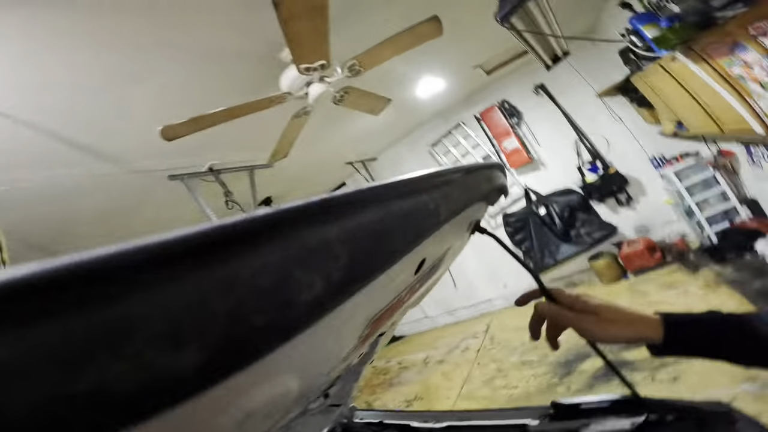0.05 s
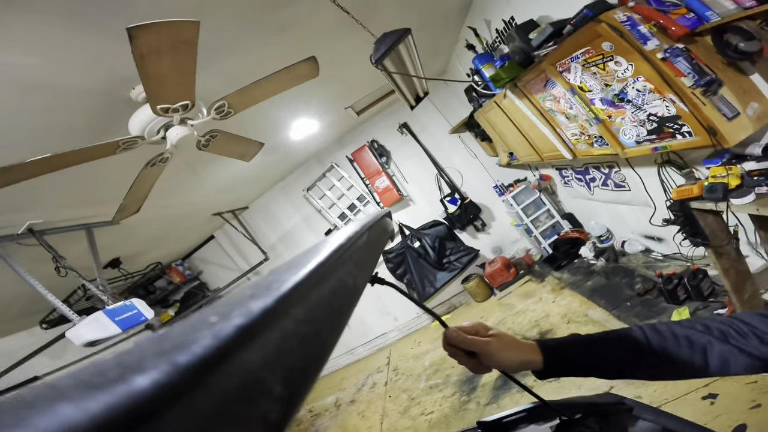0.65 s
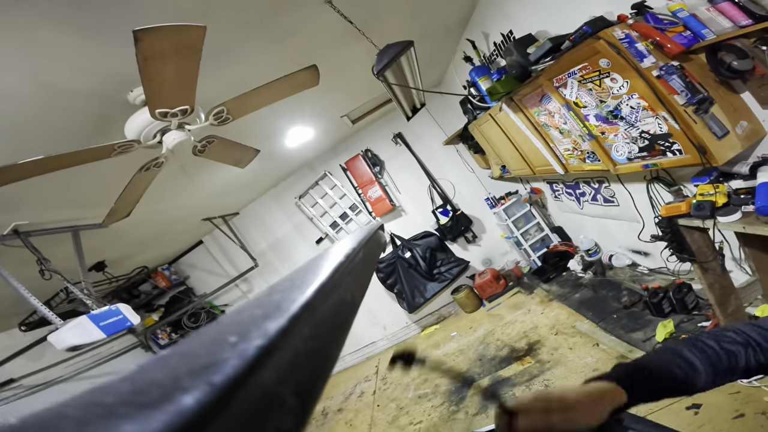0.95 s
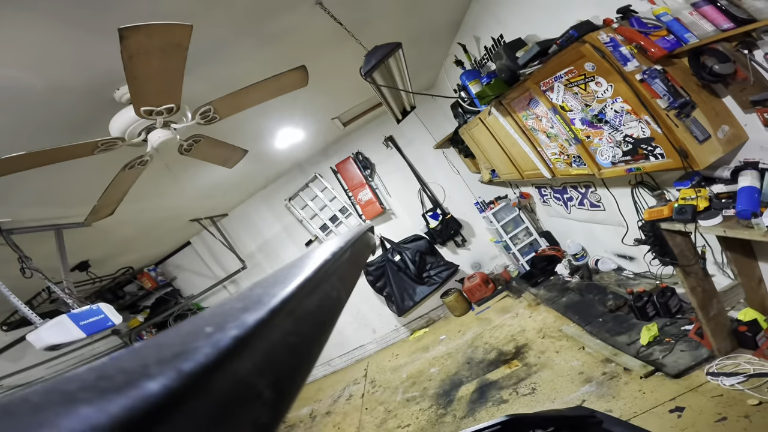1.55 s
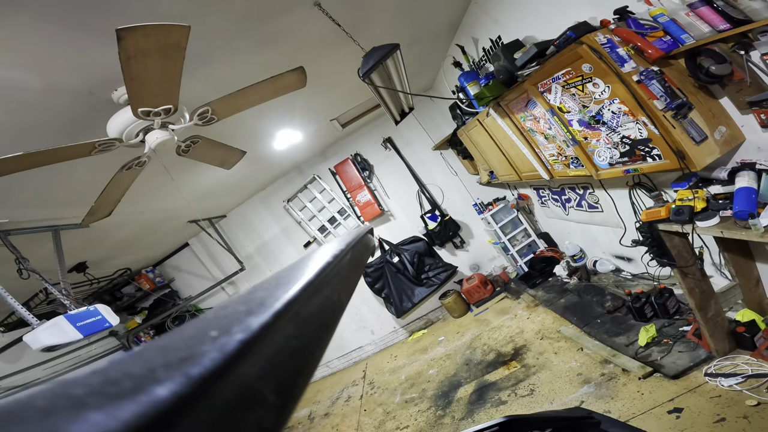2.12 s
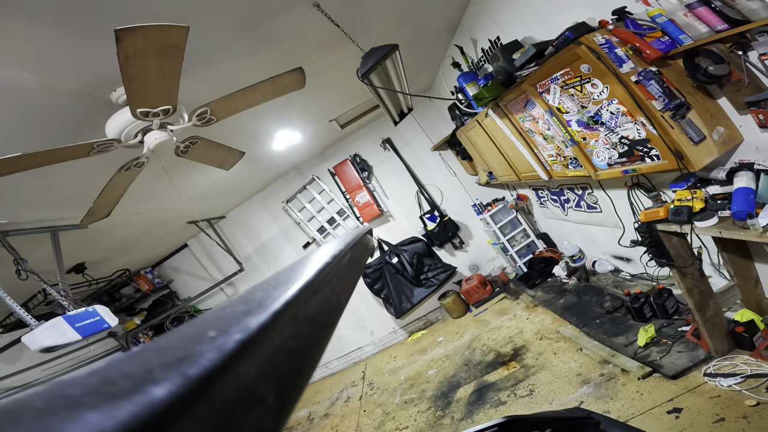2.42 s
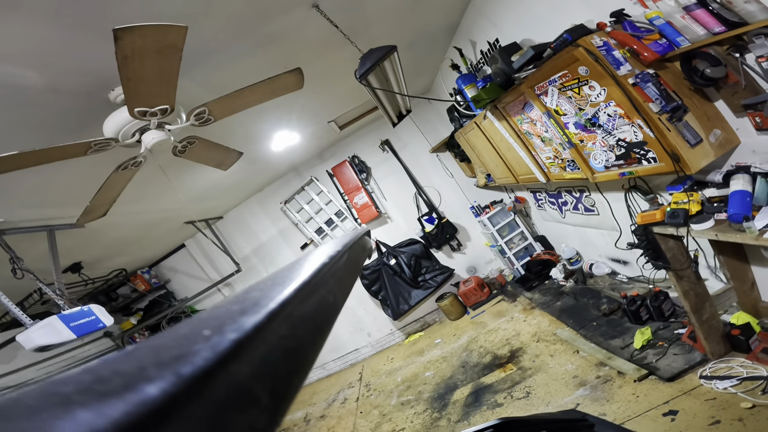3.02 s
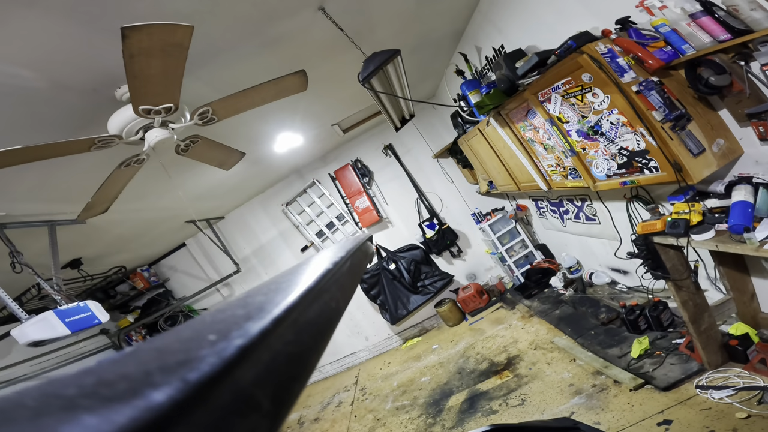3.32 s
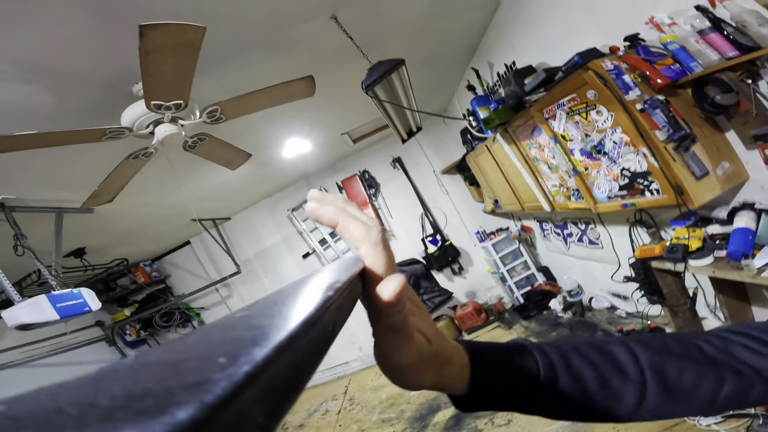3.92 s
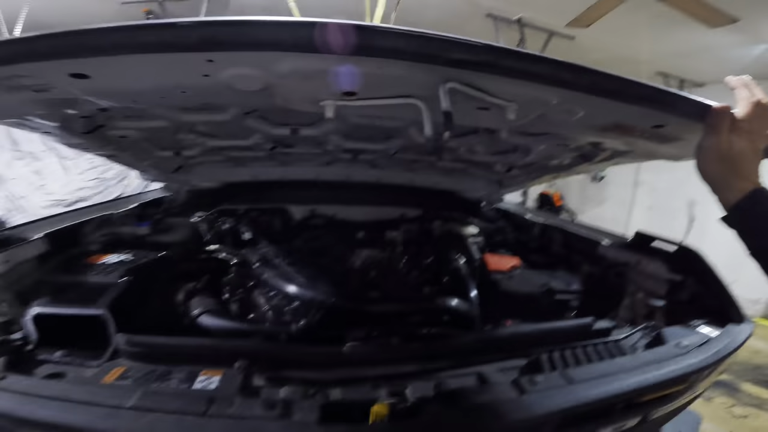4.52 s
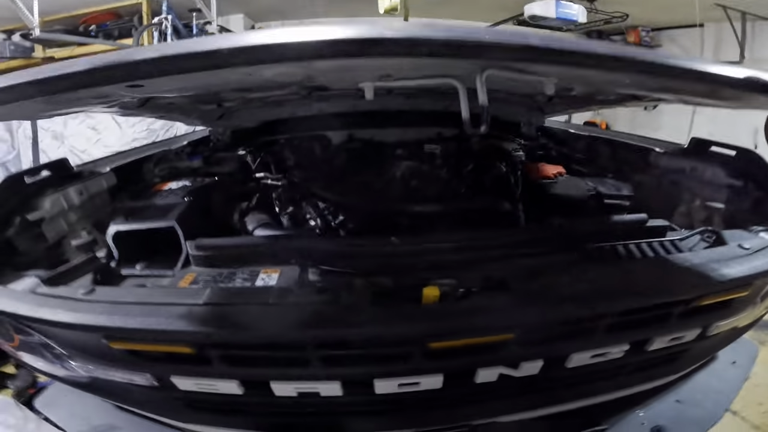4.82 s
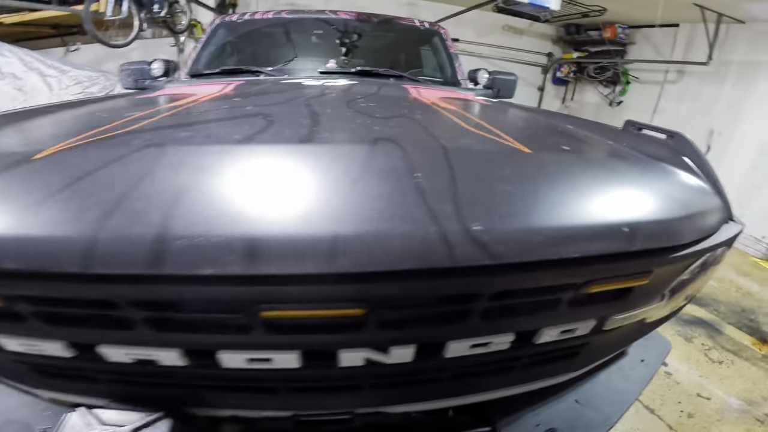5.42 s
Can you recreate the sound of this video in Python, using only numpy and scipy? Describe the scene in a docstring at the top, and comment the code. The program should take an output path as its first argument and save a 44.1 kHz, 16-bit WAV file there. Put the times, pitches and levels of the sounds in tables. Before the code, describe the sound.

Clothing rustles and bumps a body-worn microphone while a car hood's prop rod is unhooked with a cluster of metallic clunks. The rod taps lightly as it swings down and clacks into its holder. After a quieter stretch of rubbing and low rumble, the hood slams shut, its sheet steel and latch ringing briefly in the garage.

```python
"""A car hood slams in a garage: the sheet steel booms, the latch catches and the room rings.
Before that, the prop rod is unhooked, swung down and snapped into its clip, and a hand pulls the hood down.
Each knock is a burst of tiny impacts that sets the steel ringing and echoes in the room.
The microphone is worn on the body, so movement adds a low rumble and the rustle of a sleeve."""
import sys
import numpy as np
from scipy import signal
from scipy.fft import rfft, irfft, next_fast_len
from scipy.io import wavfile
from scipy.ndimage import uniform_filter1d

SR = 44100
rng = np.random.default_rng(int(sys.argv[2]) if len(sys.argv) > 2 else 0)


def output_pcm(signal):
    """Save a mono or channel-first signal as 16-bit PCM at the path in sys.argv[1].

    Samples are clipped to [-1, 1] before scaling.
    """
    pcm = np.clip(np.atleast_2d(signal).T, -1, 1) * 32767
    wavfile.write(sys.argv[1], SR, np.round(pcm).astype(np.int16))


N = 249517

# A "colour" says how strong low and high pitches are. Levels are relative: the functions add overall gains.
# Colours of the background noises (frequency [Hz], level [dB])
AIR_COLOUR = [(30, -1), (100, -9.5), (200, -4.5), (450, -32), (1200, -40.5), (3500, -46.5), (5500, -43),
              (9000, -49.5), (13000, -53.5)]  # still air
RUMBLE_COLOUR = [(12, 3), (33, 9.5), (55, -4), (100, -17.5), (180, -22), (300, -44.5), (600, -51),
                 (2000, -85.5)]  # the shaken microphone
BUFFET_COLOUR = [(30, -16), (80, 10.5), (170, 2.5), (280, -12), (500, -28), (1200, -89)]  # air and cloth pushing on the microphone
SLEEVE_COLOUR = [(100, -12.5), (250, -3), (400, 2), (700, -11), (1000, -11), (1600, -11.5), (2500, -22),
                 (4000, -26), (6500, -26), (8500, -40.5), (13000, -45.5), (15000, -53)]  # a rustling sleeve
SLIDE_COLOUR = [(400, -22), (800, -15.5), (1130, -4.5), (1450, -14), (2500, -23.5), (7000, -36.5),
                (9500, -58)]  # a hand sliding on steel
SCRAPE_COLOUR = [(300, -25), (950, -8.5), (1600, -9.5), (2600, 6.5), (5800, 6), (7500, 5), (13500, -4),
                 (15000, -26.5)]  # cloth dragging close by
DRAG_COLOUR = [(550, -20), (800, -15), (950, 11), (1150, -4), (1750, -16), (2200, -7), (5000, -18),
               (5700, -10), (6900, -36), (14000, -33)]  # steel rubbing on steel

# Stereo width. "Mid" is what left and right share, "side" is how they differ.
# (frequency [Hz], side against mid [dB])
NEAR_WIDTH = [(30, -12.5), (200, -15.5), (1000, -5.5), (4000, -7), (12000, -3)]
ROD_WIDTH = [(30, -24.5), (150, -31), (500, -43.5), (1200, -24.5), (3000, -17.5), (6500, -14.5),
             (12000, -6)]
HOOD_WIDTH = [(30, -19.5), (150, -38), (500, -14.5), (1200, -12), (3000, -7), (6500, -12.5), (12000, -1.5)]

# Shifts of the body (peak time [s], swell time [s], rumble level [dB], rustle level [dB])
BODY_MOVES = [ (0.01, 0.024, -8, -54), (0.154, 0.085, -21, -50.5), (0.345, 0.036, -17.5, -36),
              (0.527, 0.079, -33, -49.5), (3.41, 0.054, -33, -66), (3.62, 0.024, -37, -82.5),
              (3.938, 0.077, -33.5, -50.5), (4.259, 0.18, -25, -57), (4.55, 0.21, -40, -57.5),
              (4.96, 0.089, -62.5, -55.5), (5.42, 0.71, -34, -57.5)]
# Air and cloth hit the microphone as the hood comes down (peak time [s], swell time [s], level [dB])
BUFFETS = [(4.16, 0.13, -39), (4.26, 0.036, -31), (4.35, 0.026, -28), (4.92, 0.078, -43)]
# The hand slides on the rod, then on the hood (peak time [s], swell time [s], level [dB])
HAND_SLIDES = [(1.58, 0.053, -70), (1.89, 0.32, -61), (2.3, 0.18, -59.5), (2.57, 0.13, -62),
               (3.25, 0.076, -63.5), (3.94, 0.05, -56.5), (5.0, 0.19, -56)]
# Cloth drags near the microphone (start [s], length [s], level [dB])
CLOTH_SCRAPES = [(0.114, 0.058, -62), (2.25, 0.11, -80), (0.34, 0.019, -54), (3.925, 0.14, -74.5),
                 (4.927, 0.074, -71)]
# A fingertip on paint, then the hinge (peak time [s], swell time [s], level [dB], pitch [Hz])
SQUEAKS = [(3.86, 0.025, -55.5, 890), (4.319, 0.011, -49.5, 458)]
# The rod's tip drags out of its slot (start [s], length [s], level [dB])
ROD_DRAG = (0.322, 0.091, -38.5)

# How long the garage echoes; a "ring time" is the time to fade by 60 dB (frequency [Hz], ring time [s])
ECHO_TIMES = [(60, 0.84), (160, 0.58), (420, 0.53), (1100, 0.59), (2900, 0.6), (5500, 0.58), (8000, 0.36),
              (14000, 0.11)]
# Colour of that echo (frequency [Hz], level [dB])
ECHO_COLOUR = [(40, 5.5), (150, 4), (500, 6), (1200, 1.5), (3000, 2.5), (6500, -0.5), (9000, 4.5),
               (15000, -0.5)]
# Colour shared by all blows (frequency [Hz], level [dB])
STEEL_COLOUR = [(8, -10), (25, 10), (60, 11.5), (180, 14.5), (400, 6.5), (650, 1), (800, 2), (1100, 1.5),
                (1600, -3), (2300, -5), (3500, -6.5), (6500, -5), (8500, -10.5), (13500, -9), (15500, -25)]
# The pitches each struck part favours, listed by its name (frequency [Hz], peak height [dB])
PART_PEAKS = { "mount": [(380, 1.5), (920, 8.5), (1250, 12), (1700, 6), (5600, -9)], "hook": [(670, 10),
              (931, 1.5), (1085, 11.5), (1400, 15), (1560, 11), (1760, 14)], "rod": [(430, 15), (690, 13),
              (900, 10.5), (1150, 11.5), (1400, 11), (1770, 9), (2300, 14), (2650, 14), (4100, 4),
              (6300, 1.5)], "panel": [(305, 7), (560, 9), (690, 10.5), (1060, 11.5), (2150, 10.5),
              (2520, 10.5), (3050, 14), (6000, 14.5)], "trim": [(340, 8.5), (550, 8.5), (710, 8), (1115, 6),
              (1450, 7.5), (2080, 6), (2860, 6)], "socket": [(240, 4), (550, 4), (1030, 10.5), (1270, 8.5),
              (1600, 8), (5500, 8), (7200, 14)], "cover": [(300, 2), (780, 2), (1000, 2), (2000, 3)],
              "frame": [(370, 2), (550, 11), (920, 2.5), (1110, 6.5), (1400, 9)], "clip": [(420, 5.5),
              (560, 5), (1100, 5), (1320, 5.5), (1840, 1), (2220, 2.5), (2820, 5.5), (5550, 3),
              (7200, 4.5)], "seat": [(680, 11), (990, 12), (1400, 9), (1650, 5.5), (1990, 5.5),
              (7000, 3.5)], "hinge": [(375, 10), (690, 3.5), (1010, 8), (1270, 7.5), (1460, 7.5),
              (2550, 12)], "striker": [(320, 10), (1250, 17.5), (1500, 14.5), (1870, 14), (2300, 14),
              (4120, -3.5), (6200, 2.5), (10500, 8)], "latch": [(340, 3), (510, 6.5), (1100, 3.5),
              (1350, 8), (2100, -1.5), (10200, 5)], "spring": [(420, 12.5), (1400, 9.5), (3500, -2),
              (6850, 11)], "catch": [(300, 10.5), (530, 7), (950, 1), (2300, 0), (3900, 5), (5720, 4)]}
# A soft, low thud on the microphone's mount (frequency [Hz], peak height [dB])
PART_PEAKS["low bump"] = [(375, 10), (690, 3.5), (1010, 8), (1270, 7.5), (1460, 7.5), (2550, 12)]
# "Modes" are the tones a part rings with by itself (frequency [Hz], level [dB], ring time [s])
HARDWARE_MODES = [(1825, 3.5, 0.49), (1930, -2.5, 0.22), (2117, 3.5, 0.36), (2260, -0.5, 0.4),
                  (2880, -6.5, 0.48), (7000, 10, 0.1)]  # rod, clip and latch
HOOD_MODES = [(108.8, -10.5, 0.53), (171.8, -0.5, 0.37), (221.1, -6, 0.36), (317, -2.5, 0.29),
              (395.4, 0.5, 0.2), (518.4, 0, 0.21), (562, -3, 0.3), (612, -4, 0.46), (664.6, -1, 0.38),
              (950, -4.5, 0.35), (1066, -11, 0.46), (1118, -1.5, 0.093)]  # the hood's sheet steel

# Four lists of blows, one blow a row (time [s], level [dB], extra bass [dB], tilt [dB per octave],
# dull above [Hz], struck part [name], clatter time [s], room echo [dB], hood ring [dB])
MOUNT_BUMPS = [  # the microphone's mount on clothing
    (0.318, -19, -1.5, -1, 1400, "mount", 0.0014, -14, -27),
    (0.3245, -26, -6.5, 0.5, 4600, "mount", 0.0013, -11.5, -17.5),
    (0.398, -26.5, -0.5, 1, 1400, "mount", 0.0018, -15.5, -18.5),
    (0.434, -36, 9.5, -12, 2346, "low bump", 0.005, -32, -14.5)]
DULL_KNOCKS = [ (0.363, -27, 3.5, 8, 1880, "hook", 0.0016, -18, -15.5),
               (0.472, -12, -11, 4.5, 1400, "hook", 0.0066, -21.5, -2),
               (1.166, -29, 8, 5.5, 2070, "trim", 0.003286, 3, 2),
               (1.644, -30.5, 0, 7, 2200, "cover", 0.022, -14, 4),
               (1.667, -30.5, -13, 3.5, 2760, "cover", 0.012, -2, 8),
               (2.368, -41.5, 5, 2.5, 1670, "frame", 0.0025, -8, -5),
               (2.42, -34, -3, 1, 1540, "frame", 0.0053, -9, -7),
               (2.556, -38, 4, 0.5, 1886, "frame", 0.00365, -10.5, -3),
               (3.261, -40.5, -6, -2, 1980, "cover", 0.0011, -9.5, 0.5)]  # softer contacts, as on plastic trim
ROD_KNOCKS = [ (0.62, -25, 8.5, -0.5, 1880, "frame", 0.0058, 1, 3.5),
              (0.662, -8, 3.5, 4, 1870, "rod", 0.0045, -8.5, -7.5),
              (0.693, -15.5, -0.5, -1.5, 1300, "rod", 0.0029, -5, 7.5),
              (0.716, -8.5, -9.5, -1.5, 1980, "panel", 0.0015, -12, 3),
              (1.107, -45.5, 2, 4, 1380, "frame", 0.001, 2.5, -11),
              (2.07, -24.5, -11.5, 0, 1670, "socket", 0.0045, -10, -12),
              (2.083, -29, 3.5, 1, 1600, "socket", 0.0063, -5.5, -1),
              (2.807, -11, -5.5, 6.5, 1750, "clip", 0.0017, -2.5, -15),
              (2.811, -12.5, -5.5, 4, 1800, "clip", 0.0021, -1.5, -13),
              (2.86, -27.5, 7, 6.5, 2700, "seat", 0.12, 6.5, -2.5),
              (2.873, -26.5, 14.5, -0.5, 2400, "clip", 0.0022, -7, 5),
              (2.931, -11, -3.5, 4.5, 1540, "seat", 0.0032, -7.5, -7.5)]  # the bare rod on hood, frame and clip
HOOD_BLOWS = [ (3.52, -53.5, 4.5, -4.5, 2490, "hinge", 0.0021, -13, -7),
              (3.783, -48.5, 16.5, -2.5, 3000, "panel", 0.0021, -0.5, -1.5),
              (3.959, -43.5, 4.5, -2.5, 4000, "catch", 0.0029, -7, -2.5),
              (4.481, -41, -22, -2.5, 3160, "hinge", 0.0028, -1.5, 0.5),
              (4.589, -27.5, -1.5, -1, 1150, "hinge", 0.0078, -7.5, 0.5),
              (4.781, -46, 0.5, -7, 2300, "hinge", 0.0057, -6, -8),
              (5.1, -8.5, -3, 3, 4220, "striker", 0.002, -10, -5),
              (5.1101, -14.5, 18, 4, 4400, "latch", 0.0025, -18, -3),
              (5.119, -8.5, 9, 2.5, 2426, "latch", 0.003, -5, -1.5),
              (5.125, -17.5, 7, -5, 2980, "latch", 0.0084, -3.5, -5),
              (5.137, -23.5, 12.5, 0.5, 2390, "latch", 0.0032, -8.5, -16),
              (5.157, -18, 7, 0, 1410, "hinge", 0.00083, -2, -7),
              (5.185, -19.5, 18.5, 2, 3460, "spring", 0.0045, -4, 5),
              (5.199, -16, 3.5, 3, 3700, "catch", 0.0021, -15, -4),
              (5.2574, -15.5, -8, -1, 2640, "catch", 0.002, -9, 2.5),
              (5.645, -33, -13, 0, 2500, "frame", 0.004, -7, 3)]  # hand, hinges, slam and latch
# Wide panels flexing (time [s], starting pitch [Hz], level [dB], ring time [s], pitch lost [share])
PANEL_BOOMS = [ (0.116, 40.8, -16.5, 0.63, 0.17), (0.438, 45, -6.5, 0.064, 0), (0.716, 310, -12, 0.039, 0),
               (0.618, 48.5, -8, 0.062, 0), (0.688, 97.5, -13.5, 0.16, 0.42),
               (0.714, 165.5, -15.5, 0.31, 0.027), (2.108, 100.6, -30, 0.47, 0.034),
               (2.683, 180.3, -32, 0.12, 0.057), (2.811, 182.5, -5, 0.11, 0.16),
               (2.814, 62.7, -22.5, 0.42, 0.24), (2.832, 93.4, -12.5, 0.15, 0.049),
               (2.86, 185.6, -22, 0.22, 0.04), (5.114, 50, -4, .18, 0), (5.119, 314, -29, 0.8, 0.057),
               (5.127, 239, -20, 0.64, 0.067), (5.191, 120, -20, 0.12, 0.13),
               (5.198, 189.7, -4.5, 0.16, 0.011), (5.271, 143, -26, 0.77, 0.38),
               (5.385, 40.5, -12.5, 0.12, 0.25)]


def amp(db):
    """Turns decibels into a number to multiply by."""
    return 10 ** (np.asarray(db) / 20)


def unit(x):
    """Scales a signal to an average power of one."""
    return x / np.sqrt(np.mean(x ** 2) + 1e-20)


def curve_at(points, hz):
    """Reads a table between its rows, along straight lines on a pitch scale."""
    table_hz, value = np.transpose(points)
    return np.interp(np.log(hz + 1), np.log(table_hz + 1), value)


def add(mix, time, sound):
    """Mixes a sound in at a time in seconds."""
    part = mix[..., max(round(time * SR), 0):][..., :sound.shape[-1]]
    part += sound[..., :part.shape[-1]]


def coloured(x, colour):
    """Turns each pitch up or down as a colour table says."""
    size = next_fast_len(x.shape[-1] + 2048)
    gain = amp(curve_at(colour, np.fft.rfftfreq(size, 1 / SR)))
    return irfft(rfft(x, size) * gain, size)[..., :x.shape[-1]]


def shortest_click(colour_db):
    """The quickest-dying click that has this colour (a minimum-phase response)."""
    log_gain = np.log(amp(np.r_[colour_db, colour_db[-2:0:-1]]))
    return np.fft.ifft(np.exp(np.conj(signal.hilbert(log_gain)))).real


def stereo(mid, side, width):
    """Left and right at two close microphone openings: alike in the bass, less so in the treble."""
    side = coloured(side, width)
    return np.array([mid + side, mid - side])


def noise(colour, width=NEAR_WIDTH):
    """Steady stereo noise of a given colour."""
    mid, side = coloured(rng.standard_normal((2, N)), colour)
    return unit(stereo(mid, side, width))


def wobble(shape, span):
    """A random wander around zero, smoothed over `span` points."""
    return unit(uniform_filter1d(rng.standard_normal(shape), span))


def swells(rows):
    """Loudness of gestures that grow to a peak and fade at the same pace; their powers add."""
    t = np.arange(N) / SR
    return np.sqrt(sum((amp(db) * np.exp(-abs(t - peak) / swell)) ** 2 for peak, swell, db in rows))


def garage_air(level_db=-56.5):
    """The faint, steady hush of the garage."""
    return amp(level_db) * noise(AIR_COLOUR)


def grip(depth_db, span):
    """A rubbing surface grips unevenly, so its loudness flickers about every `span` samples."""
    return unit(amp(depth_db * wobble(N, span)))


def snags(per_second=14, height_db=3.5, decay_s=0.006):
    """Fingers and sleeve snag now and then: brief peaks in the strength of the rubbing."""
    starts = rng.uniform(0.55, 1, N) * (rng.random(N) < per_second / SR)
    return amp(height_db) * signal.lfilter([1], [1, -np.exp(-1 / (decay_s * SR))], starts)


def car_shudder(relative_db=-17.5, settle_s=0.032):
    """How hard the car rocks after each rod knock and hood blow: harder blows shake it more."""
    power, t = np.zeros(N), np.arange(SR) / SR
    for time, db, *_ in ROD_KNOCKS + HOOD_BLOWS:
        add(power, time, (amp(db + relative_db) * np.exp(-t / settle_s)) ** 2)
    return np.sqrt(power)


def body_movement(gain_db=-1, still_rumble_db=-48, still_rustle_db=-79.5, lean_right_db=1.5):
    """Movement shakes the microphone; sleeve and hand rub in small uneven catches."""
    catches = unit(grip(depth_db=2.0, span=SR // 120) + snags())
    shake = swells((peak, swell, db) for peak, swell, db, _ in BODY_MOVES)
    rub = swells((peak, swell, db) for peak, swell, _, db in BODY_MOVES)
    rumble = np.sqrt(shake ** 2 + car_shudder() ** 2 + amp(still_rumble_db) ** 2) * noise(RUMBLE_COLOUR)
    buffet = swells(BUFFETS) * noise(BUFFET_COLOUR)
    sleeve = np.hypot(rub, amp(still_rustle_db)) * catches * noise(SLEEVE_COLOUR)
    hand = swells(HAND_SLIDES) * catches * noise(SLIDE_COLOUR, ROD_WIDTH)
    balance = amp([[-lean_right_db], [lean_right_db]])
    return amp(gain_db) * ((rumble + buffet) * balance + sleeve + hand)


def cloth_scrapes(fade_s=0.02, lean_left_db=4.0):
    """Cloth grips, drags for a moment close to the microphone and lets go."""
    t, level = np.arange(N) / SR, np.zeros(N)
    for start, length, db in CLOTH_SCRAPES:
        level += amp(db) * np.clip(np.minimum(t - start, start + length - t) / fade_s, 0, 1)
    balance = amp([[lean_left_db], [-lean_left_db]])
    return level * grip(depth_db=2.5, span=SR // 500) * noise(SCRAPE_COLOUR) * balance


def squeaks(spread=1.7, edge_db=-50):
    """A fingertip and the hinge stick and slip: each gives a fuzzy tone, made of noise around one pitch."""
    out = np.zeros((2, N))
    for peak, swell, db, hz in SQUEAKS:
        narrow_band = [(hz / spread, edge_db), (hz, 0), (hz * spread, edge_db)]
        out += swells([(peak, swell, db)]) * noise(narrow_band, ROD_WIDTH)
    return out


def rod_drag(fade_s=0.013, ease_db=-11.0):
    """Steel rubs on steel: an unbroken rasp that eases as the rod's tip comes free."""
    start, length, db = ROD_DRAG
    t = np.arange(N) / SR - start
    fade = np.clip(np.minimum(t, length - t) / fade_s, 0, 1)
    level = amp(db + ease_db * np.clip(t / length, 0, 1))
    return fade * level * grip(depth_db=3.0, span=SR // 500) * noise(DRAG_COLOUR)


def garage_echo(build_s=0.008, size=40000):
    """The room's echo, mid and side: reflections build up, then each pitch dies at its own speed."""
    hz, t, bands = signal.stft(rng.standard_normal((2, size)), SR, nperseg=256)
    bands = bands * amp(curve_at(ECHO_COLOUR, hz))[:, None]
    bands /= 1000 ** (t / curve_at(ECHO_TIMES, hz)[:, None])  # dividing by 1000 is a 60 dB drop
    tail = signal.istft(bands, SR)[1][:, :size]
    build_up = 1 - np.exp(-(np.arange(size) / SR / build_s) ** 2)
    return tail * build_up / np.sqrt(0.023 * SR)


def clatter(decay_s, grain_db=3.5, even_hz=170, size=8192):
    """Parts chatter as they meet: a dying burst of tiny impacts, evenly strong at all pitches."""
    t = np.arange(size) / SR
    impacts = amp(grain_db * wobble(size, SR // 1000))
    age = t / max(decay_s, 0.001)
    swell = (1 - np.exp(-age)) * np.exp(-age)  # a long rattle also starts more softly
    spectrum = rfft(rng.standard_normal(size) * impacts * swell)
    nearby_power = uniform_filter1d(abs(spectrum) ** 2, int(even_hz * size / SR))
    fade_out = np.minimum(2 - 2 * t / t[-1], 1) ** 2
    return irfft(spectrum / np.sqrt(nearby_power)) * fade_out


def steel_ring(modes, waver=0.0, waver_s=0.025, size=30000):
    """Struck steel rings with fading tones; flexing can make their pitch waver."""
    t = np.arange(size) / SR
    hz, db, ring_s = np.transpose(modes)[:, :, None]
    strength = amp(db) * rng.choice([-1, 1], db.shape)  # each tone starts up or down at random
    flex = wobble((len(modes), size), int(waver_s * SR))
    cycles = hz * np.cumsum(1 + waver * flex, 1) / SR
    return (strength * np.sin(2 * np.pi * cycles) / 1000 ** (t / ring_s)).sum(0)


def contact_colour(hz, thud_db, tilt_db, dull_hz, fall_db, thud_below_hz=161, pivot_hz=755):
    """Colour of a contact in dB: weight gives a thud, a soft touch loses fall_db of treble an octave."""
    thud = thud_db / (1 + (hz / thud_below_hz) ** 4)
    tilt = tilt_db * np.log2(np.clip(hz, 345, 2100) / pivot_hz)  # light parts tilt up, heavy ones down
    softness = fall_db / 4 * np.log2(1 + (hz / dull_hz) ** 4)
    return thud + tilt - softness


def part_colour(part, hz, width_hz=55, width_share=0.11, around_hz=900, free_hz=3500):
    """Colour of the struck part in dB: it gathers energy into its own peaks, with valleys between."""
    centre, height = np.transpose(PART_PEAKS[part])[:, :, None]
    width = width_hz + width_share * centre
    peaks = (height / (1 + (2 * (hz - centre) / width) ** 2)).sum(0)
    nearby_db = 10 * np.log10(uniform_filter1d(amp(peaks) ** 2, int(around_hz / hz[1])))
    return peaks - nearby_db / (1 + (hz / free_hz) ** 4)  # peaks well above free_hz keep their height


def crowded_modes(hz, ripple_db=3.0, spacing_hz=110):
    """The many high tones of joined steel parts: narrow random peaks and dips in dB."""
    ripple = wobble(len(hz), int(spacing_hz / hz[1]))
    return ripple_db * ripple * hz / (hz + 2000)  # weaker in the bass


def blow(db, thud_db, tilt_db, dull_hz, part, clatter_s, room_db, ring_db, fall_db, hardware_db):
    """One contact: a clatter, the ring it leaves in hood and hardware, and the room's echo."""
    hz = np.fft.rfftfreq(4096, 1 / SR)
    colour_db = contact_colour(hz, thud_db, tilt_db, dull_hz, fall_db) + curve_at(STEEL_COLOUR, hz)
    colour_db += part_colour(part, hz) + crowded_modes(hz)
    click = shortest_click(db + colour_db)
    mid, side = amp(room_db) * garage_echo()
    add(mid, 0, clatter(clatter_s))
    add(side, 0, clatter(clatter_s))
    add(mid, 0, amp(ring_db - 49.0) * steel_ring(HOOD_MODES, waver=0.0099))
    add(mid, 0, amp(hardware_db) * steel_ring(HARDWARE_MODES))
    return signal.fftconvolve(click[None], [mid, side], axes=1)  # all of it takes the click's colour


def blows(rows, width, gain_db, fall_db, hardware_db):
    """Plays a list of blows; they share a treble slope and how strongly they ring the hardware."""
    out = np.zeros((2, N))
    for time, *settings in rows:
        add(out, time, blow(*settings, fall_db, hardware_db))
    return amp(gain_db) * stereo(*out, width)


def mount_bumps():
    """The microphone's mount bumps against clothing, ending with a soft, low thud."""
    return blows(MOUNT_BUMPS, NEAR_WIDTH, gain_db=27.5, fall_db=14.5, hardware_db=-65.5)


def dull_knocks():
    """Soft contacts, as on plastic trim, lose their treble steeply."""
    return blows(DULL_KNOCKS, ROD_WIDTH, gain_db=25.0, fall_db=29.5, hardware_db=-63.5)


def rod_knocks():
    """The bare steel rod knocks on hood and frame, then snaps into its clip."""
    return blows(ROD_KNOCKS, ROD_WIDTH, gain_db=27.0, fall_db=13.5, hardware_db=-69.0)


def panel_booms(rise_s=0.0088, sag_s=0.063):
    """A flexed panel swings at one low pitch, which may sink as the steel settles."""
    out, t = np.zeros(N), np.arange(SR) / SR
    for time, hz, db, ring_s, sag in PANEL_BOOMS:
        pitch = hz * (1 - sag * (1 - np.exp(-t / sag_s)))
        loudness = amp(db) * (1 - np.exp(-t / rise_s)) / 1000 ** (t / ring_s)
        add(out, time, loudness * np.sin(2 * np.pi * np.cumsum(pitch) / SR))
    return out


def hood_slam():
    """The hood comes down on knocking hinges and slams into its latch in a quick run of hard blows."""
    return blows(HOOD_BLOWS, HOOD_WIDTH, gain_db=27.5, fall_db=12.0, hardware_db=-57.5)


def scene():
    """Adds up the knocks, the slam, the rubbing sounds and the still air."""
    impacts = mount_bumps() + rod_knocks() + dull_knocks() + hood_slam() + panel_booms()
    movement = body_movement() + rod_drag() + cloth_scrapes() + squeaks()
    return impacts + movement + garage_air()


def record(dry, cutoff_hz=15500):
    """Rounds off the loudest peaks, then removes the very highest treble."""
    rounded = dry / (1 + dry ** 6) ** (1 / 6)
    low_pass = signal.firwin(255, cutoff_hz, window=("kaiser", 8), fs=SR)
    return signal.oaconvolve(rounded, low_pass[None], "same")


dry = scene()
out = record(dry)
output_pcm(out)
```